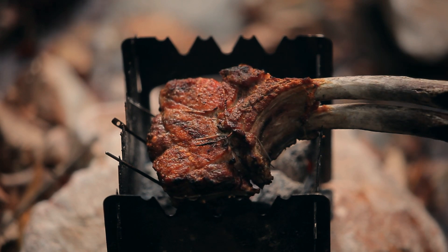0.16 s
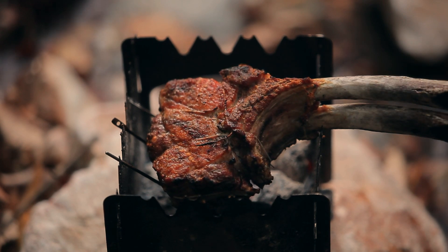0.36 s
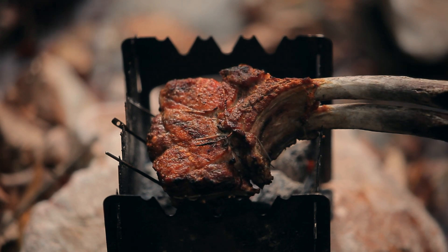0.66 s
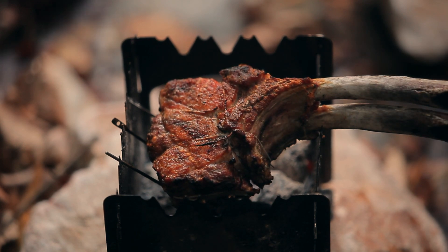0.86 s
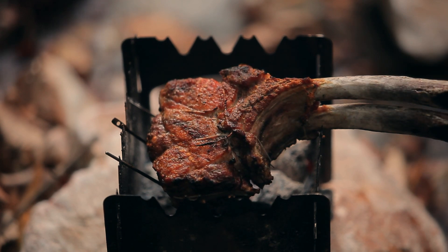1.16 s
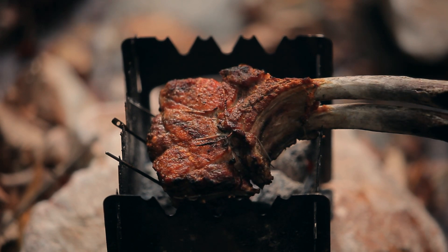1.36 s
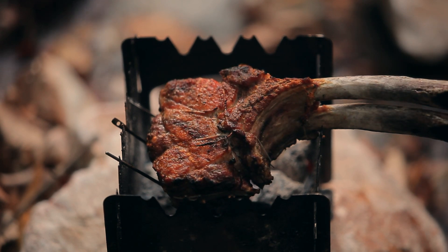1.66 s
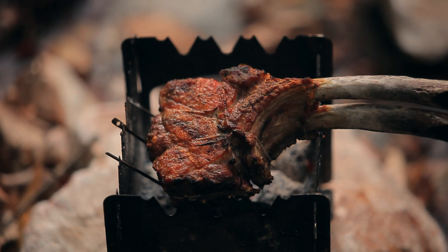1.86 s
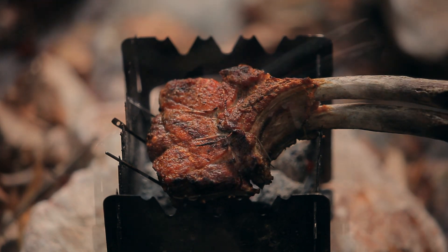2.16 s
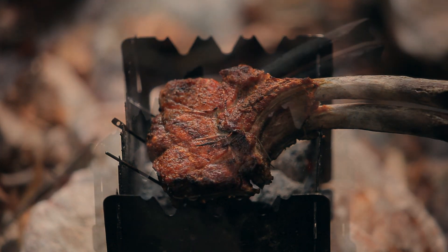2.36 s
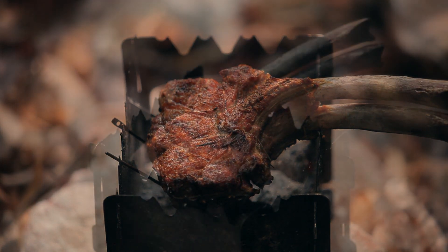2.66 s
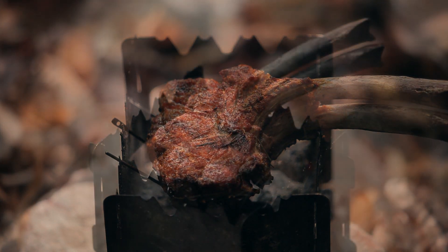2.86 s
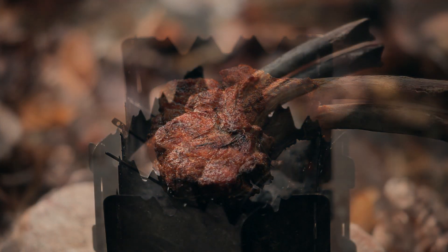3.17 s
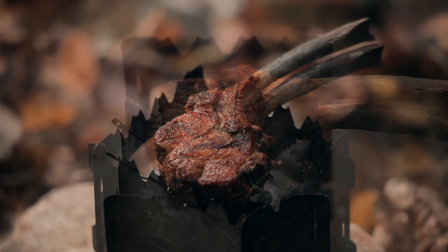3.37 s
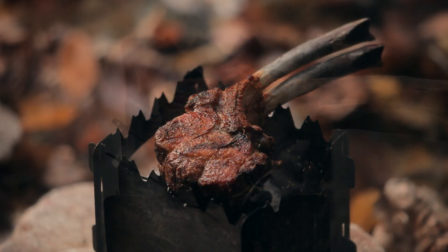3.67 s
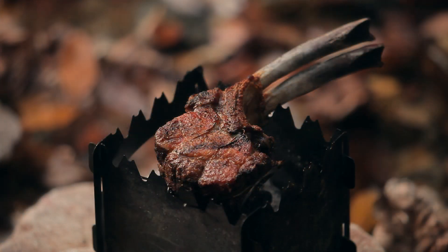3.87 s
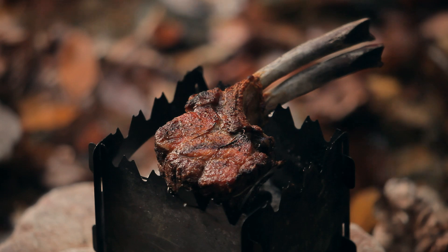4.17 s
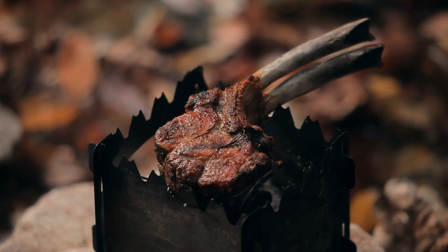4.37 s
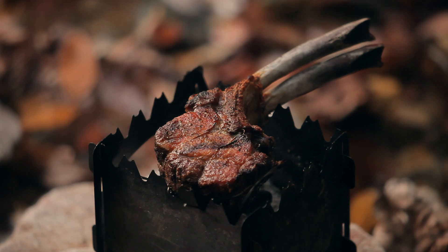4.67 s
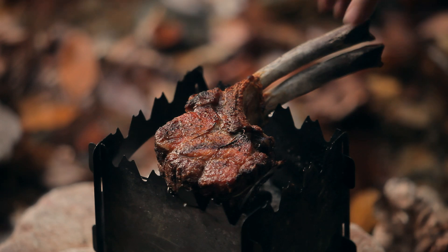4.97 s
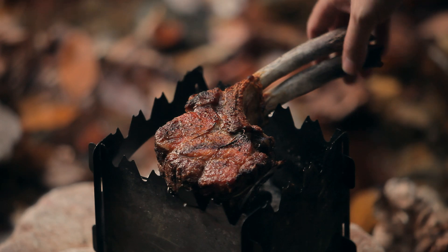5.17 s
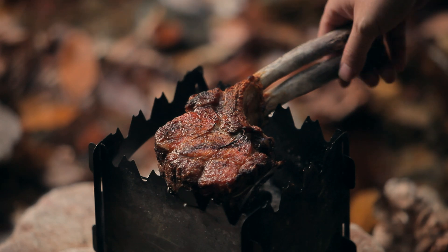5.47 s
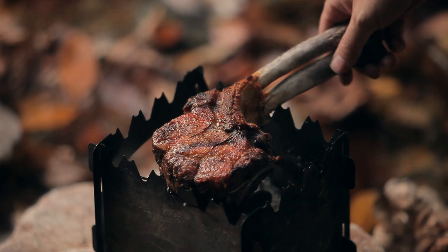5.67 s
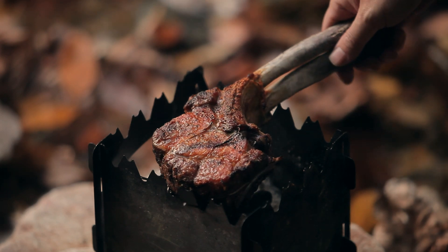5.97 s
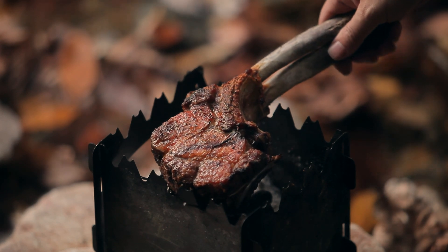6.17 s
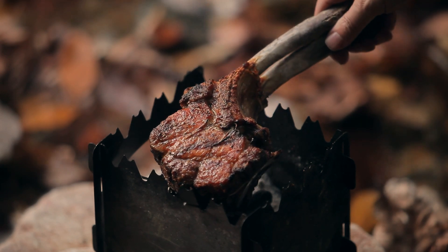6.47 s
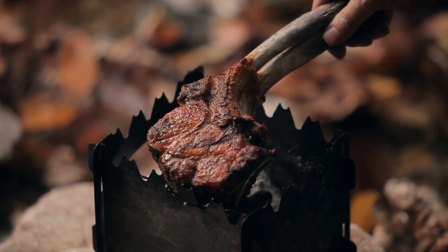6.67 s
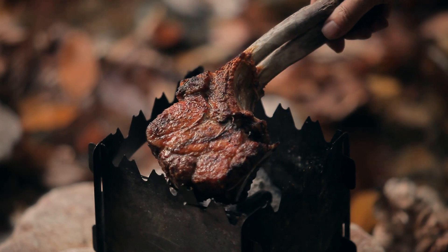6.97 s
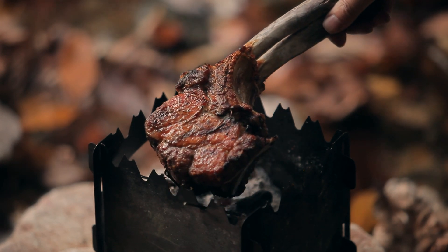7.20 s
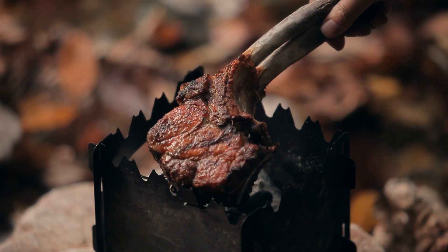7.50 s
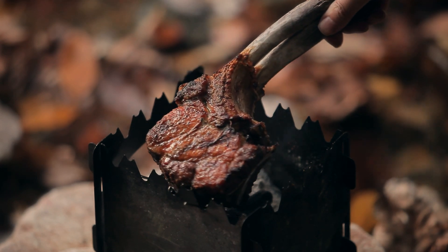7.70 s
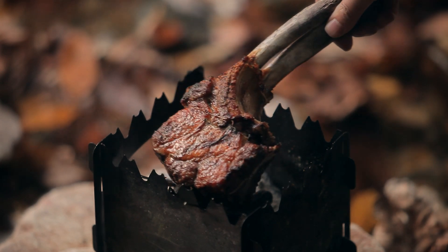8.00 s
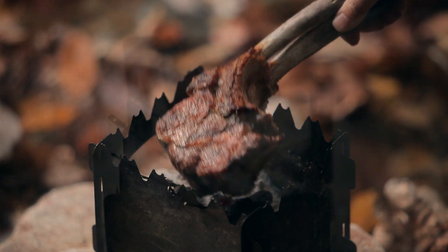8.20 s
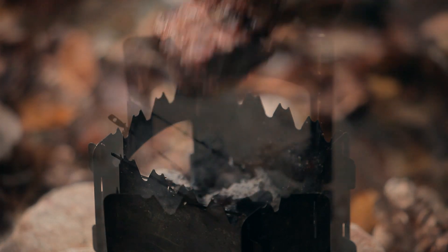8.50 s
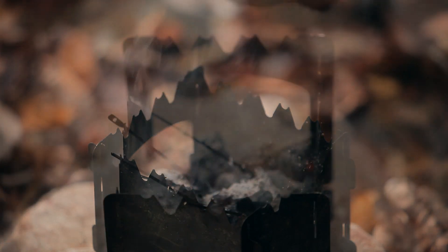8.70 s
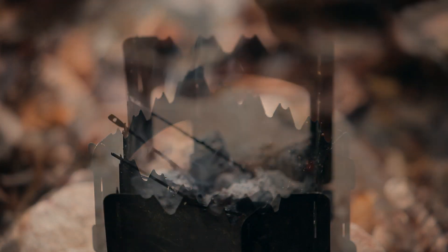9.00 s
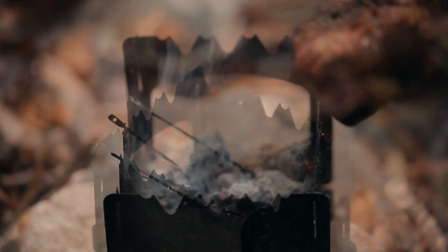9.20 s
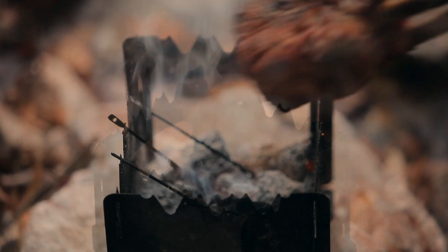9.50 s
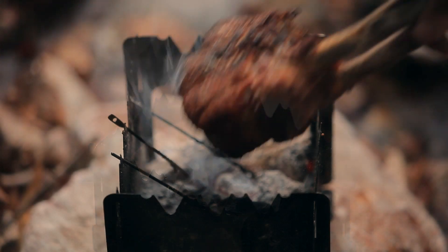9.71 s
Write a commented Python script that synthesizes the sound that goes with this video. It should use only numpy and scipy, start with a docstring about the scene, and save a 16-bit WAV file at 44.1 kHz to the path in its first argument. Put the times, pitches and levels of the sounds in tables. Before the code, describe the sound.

Fat seethes and hisses without pause over hot coals, mono and near, with almost no room sound beyond a very short tinny echo from the stove walls. Irregular mid-high pops and dry high ticks scatter on top. The first two and a half seconds add a dull breeze, small thumps, sputters and tiny steam squeaks; later it is cleaner, with a dense run of pops past seven seconds and sparser crackle afterwards.

```python
"""Meat sizzles over charcoal in a small sheet-metal camp stove outdoors: random short rings over a steam hiss.
Above this bed, steam bubbles burst in the fat, each a short ring at its own pitch with a broad snap.
Droplets spit with sharp ticks, the fat sputters in flurries, and steam squeaks in short sliding tones.
Pops and ticks echo off the metal walls, made by filtering them through a short fading noise.
Low thumps, and filtered noise for gusts and a dull wash of wind, come mostly in the first seconds."""
import sys
import numpy as np
from scipy import signal
from scipy.fft import rfft, irfft, next_fast_len
from scipy.io import wavfile
from scipy.ndimage import uniform_filter1d

SR = 44100
rng = np.random.default_rng(int(sys.argv[2]) if len(sys.argv) > 2 else 0)


def output_pcm(signal):
    """Save a mono or channel-first signal as 16-bit PCM at the path in sys.argv[1].

    Samples are clipped to [-1, 1] before scaling.
    """
    pcm = np.clip(np.atleast_2d(signal).T, -1, 1) * 32767
    wavfile.write(sys.argv[1], SR, np.round(pcm).astype(np.int16))


N = 434385  # length in samples


def from_db(db):
    """Turns dB into a gain."""
    return 10 ** (np.asarray(db) / 20)


def rms_one(x):
    """Scales a sound so that its average strength (rms) is 1."""
    return x / np.sqrt(np.mean(x ** 2) + 1e-20)


def filtered(x, order, edges_hz, kind):
    """Keeps only part of the spectrum: a band, or all above an edge."""
    return signal.sosfilt(signal.butter(order, edges_hz, kind, fs=SR, output="sos"), x)


def random_signs(count):
    """Lets each click push either up or down at random."""
    return rng.choice([-1, 1], count)


def drift(rate_hz):
    """Slow random wandering with spread 1: noise smoothed twice by a one-pole low-pass."""
    step = 40  # one slow value every 40 samples
    r = np.exp(-2 * np.pi * rate_hz * step / SR)
    noise = rng.standard_normal(N // step + 2002)
    slow = signal.lfilter([1], [1, -2 * r, r * r], noise)[2000:]  # skip the filter's start
    return np.interp(np.arange(N) / step, np.arange(len(slow)), rms_one(slow))


# How lively the sizzle is. Each row: time in seconds, then the level of the bubbling, of the fine fizz
# and of the low murmur, each in dB.
SIZZLE_LEVELS = [(0.0, -43, -51, -57.5), (0.52, -44, -50.5, -56.5), (0.96, -47.5, -53.5, -62),
                 (1.45, -42.5, -52.5, -57), (1.67, -46.5, -53.5, -63.5), (2.17, -44, -51, -56),
                 (2.36, -44, -53, -60.5), (2.65, -47.5, -56, -62), (3.4, -50, -57, -62),
                 (3.7, -47, -56.5, -60.5), (4.2, -44.5, -56, -56.5), (4.63, -45, -54, -59),
                 (5.43, -43.5, -54.5, -58), (5.73, -40.5, -51, -54.5), (5.98, -43, -54.5, -56),
                 (6.61, -44.5, -52.5, -58.5), (6.88, -41, -51, -57), (7.1, -43.5, -53, -58),
                 (7.45, -42.5, -51.5, -57), (7.9, -45.5, -54, -61.5), (8.15, -47.5, -57.5, -61),
                 (9.1, -45.5, -53, -60.5), (9.5, -47.5, -53, -60), (9.85, -44, -52.5, -58)]


def sizzle_levels():
    """The sizzle grows and shrinks: each level moves in straight lines from row to row."""
    seconds, *columns = np.transpose(SIZZLE_LEVELS)
    return [np.interp(np.arange(N) / SR, seconds, column) for column in columns]


def ring(clicks, hz, t60):
    """Each click sets a sine ringing, which falls by 60 dB in t60 seconds."""
    r = from_db(-60 / (t60 * SR))
    w = 2 * np.pi * hz / SR
    return signal.lfilter([0, np.sin(w)], [1, -2 * r * np.cos(w), r * r], clicks + 1e-18)


def grains(low_hz, high_hz, per_s, spread_db, cycles, clumps_db, hiss_db, count):
    """Random bursts of all sizes come in clumps, each rings at one of many pitches, over a steam hiss."""
    sizes = from_db(spread_db * np.minimum(rng.exponential(1, N), 3.5)) * random_signs(N)
    born = rng.random(N) < per_s * from_db(clumps_db) / SR
    pitch_number = rng.integers(0, count, N)
    rings = np.zeros(N)
    for k, hz in enumerate(np.geomspace(low_hz, high_hz, count)):
        rings += ring(sizes * born * (pitch_number == k), hz, cycles / hz)
    hiss = signal.lfilter([1], [1, -.9], rng.standard_normal(N))
    return rms_one(rings) + from_db(hiss_db) * rms_one(hiss)


def coloured(x, spectrum):
    """Evens out the long-term spectrum of x, then gives it the table's colour, at rms 1."""
    size = next_fast_len(N)
    bins = rfft(x, size)
    hz = np.arange(size // 2 + 1) * SR / size + 1  # the 1 avoids log(0)
    own = np.sqrt(uniform_filter1d(np.abs(bins) ** 2, size=1501)) + 1e-12
    table_hz, table_db = np.transpose(spectrum)
    wanted_db = np.interp(np.log(hz), np.log(table_hz), table_db, left=-90, right=-90)
    return rms_one(irfft(bins / own * from_db(wanted_db), size)[:N])


# Colour of the bubbling. Each row: frequency in Hz, relative strength in dB per Hz.
BUBBLING_COLOUR = [(260, -21.5), (450, -8), (612, -7), (713, 0), (970, 0), (1060, -1.5), (1290, 0),
                   (1790, -1), (3210, 2.5), (4030, -8), (5200, -21), (6760, -28), (11400, -120)]


def bubbling(level_db, seethe):
    """The body of the sizzle: a crowd of small ringing bursts and hiss in the middle pitches."""
    clumps_db = 2.5 * seethe + 1.5 * drift(30)
    crowd = grains(487, 4994, per_s=1500., spread_db=3.5, cycles=45.0,
                   clumps_db=clumps_db, hiss_db=-2.0, count=24)
    return from_db(level_db) * coloured(crowd, BUBBLING_COLOUR)


# Colour of the fine fizz. Each row: frequency in Hz, relative strength in dB per Hz.
FIZZ_COLOUR = [(2350, -7), (4000, -0.5), (4960, -1.5), (8120, -6.5), (13900, -17.5), (15200, -16.5),
               (16000, -29)]


def fizz(level_db, seethe):
    """The treble of the sizzle: high ringing bursts under a stronger hiss."""
    clumps_db = 3.0 * seethe + 2.0 * drift(30)
    crowd = grains(3660, 14900, per_s=2000., spread_db=6.5, cycles=53.0,
                   clumps_db=clumps_db, hiss_db=7.0, count=20)
    return from_db(level_db) * coloured(crowd, FIZZ_COLOUR)


# Colour of the low murmur. Each row: frequency in Hz, relative strength in dB per Hz.
MURMUR_COLOUR = [(26, -69), (45, -37), (75, -30), (108, -19.5), (179, -16), (252, -9.5), (310, -8.5),
                 (351, -2), (390, -1), (432, -7.5), (485, -9), (556, -5.5), (700, -7), (910, -24),
                 (1540, -120)]


def murmur(level_db):
    """The low part of the sizzle: fewer, deeper ringing bursts that clump on their own."""
    crowd = grains(111.0, 666, per_s=600., spread_db=2.5, cycles=19.3,
                   clumps_db=2.5 * drift(25), hiss_db=-1.0, count=10)
    return from_db(level_db) * coloured(crowd, MURMUR_COLOUR)


def scattered(rule, level_db):
    """Gives rows (seconds, peak dB, Hz) at random moments, louder where the sizzle is livelier."""
    per_s, above_db, spread_db, low_hz, high_hz = rule
    gap, size, pitch = rng.random((400, 3)).T
    s = np.cumsum(-np.log(1 - gap)) / per_s
    inside = s < N / SR - .01
    s, size, pitch = s[inside], size[inside], pitch[inside]
    peak_db = level_db[(s * SR).astype(int)] + above_db + spread_db * (2 * size - 1)
    hz = low_hz * (high_hz / low_hz) ** np.sqrt(pitch)  # the root favours high pitches
    return np.column_stack([s, peak_db, hz])


def bursts(events, rise, fall_db, glide, wobble):
    """Each burst swells within a cycle or so, dies away, and bends a little in pitch, each by its own amount."""
    out = np.zeros(N + SR)
    chance = rng.standard_normal((len(events), 2))
    for (s, peak_db, hz, cycles), (bend, side) in zip(events, chance):
        turns = np.arange(int(max(cycles, 1) / hz * SR)) * hz / SR  # cycles since the start
        swell = 1 - np.exp(-turns / max(rise, .05))
        fall = from_db(-fall_db * turns / max(cycles, 1))
        phase = turns * (1 + (glide + wobble * bend) * (turns - 4.0))
        wave = swell * fall * np.sin(2 * np.pi * phase)
        at = round(s * SR)
        out[at:at + len(wave)] += from_db(peak_db) * np.sign(side) * wave / np.abs(wave).max()
    return out[:N]


def snaps(s, snap_db):
    """Every bubble opens with a broad snap: a single click limited to a wide band."""
    out = np.zeros(N)
    out[np.round(s * SR).astype(int)] = from_db(snap_db) * random_signs(len(s))
    return filtered(out, 2, [1500, 8000], "band")


# Bubbles that stand out, at fixed times. Each row: start in seconds, peak of the ring in dB, pitch in Hz,
# length of the ring in cycles, height in dB of the opening click before its filter.
TIMED_POPS = [(0.0629, -41, 1080, 25, -30), (0.0633, -36, 2240, 18, -30), (0.1751, -34, 1380, 19, -31),
              (0.5034, -24.5, 3480, 21, -28), (0.5982, -31, 2960, 16, -33), (0.6124, -40, 1450, 33, -32),
              (0.6262, -37, 1490, 28, -26), (0.994, -30.5, 3600, 21, -25), (1.031, -32, 2970, 19, -23),
              (1.1427, -31.5, 3120, 37, -31), (1.213, -31, 3930, 18, -29), (1.225, -32, 3290, 10, -27),
              (1.4635, -32.5, 760, 14, -31), (1.4821, -37, 3970, 20, -27), (1.4858, -25, 2430, 14, -25),
              (1.5991, -35, 4350, 18, -15), (1.7464, -29, 2860, 18, -25), (1.9135, -31, 2930, 14, -28),
              (1.9992, -34, 2730, 15, -35), (2.2838, -36, 690, 18, -34), (2.3028, -33, 3780, 22, -34),
              (2.316, -32.5, 800, 14, -32), (2.3716, -28.5, 3490, 15, -27), (2.4113, -34, 3540, 19, -17),
              (2.4721, -36, 850, 12, -34), (2.5327, -40, 4170, 39, -34), (2.7435, -38, 4190, 18, -35),
              (3.058, -39, 4000, 22, -38), (3.1115, -39, 584, 17, -36), (3.1314, -32, 3200, 13, -30),
              (3.5365, -33, 3170, 18, -39), (3.5477, -37, 4460, 20, -27), (3.5873, -40, 682, 32, -31),
              (3.635, -36, 3880, 20, -35), (3.6559, -35, 2480, 21, -20), (3.6769, -29.5, 3280, 10, -22),
              (3.776, -27, 2900, 12, -37), (3.8076, -34, 4330, 15, -18), (3.949, -36, 3440, 38, -29),
              (3.9827, -35, 3750, 18, -16), (3.9929, -32, 3580, 18, -29), (4.0333, -35.5, 840, 18, -30),
              (4.0841, -31, 2740, 13, -23), (4.0972, -35, 2200, 16, -27), (4.1843, -30, 2920, 10, -21),
              (4.1968, -32, 3170, 38, -32), (4.3288, -30, 2530, 31, -32), (4.408, -41, 4100, 39, -28),
              (4.5938, -36, 3420, 10, -13.5), (4.6302, -40, 735, 19, -37), (4.6885, -30.5, 2530, 15, -37),
              (4.7925, -34, 2420, 24, -39), (4.8198, -36, 1520, 12, -31), (4.9739, -33, 2450, 26, -31),
              (4.9946, -34.5, 830, 27, -35), (5.0216, -38, 810, 39, -29), (5.1179, -31, 3130, 48, -30),
              (5.2892, -35, 960, 24, -33), (5.5334, -29, 3350, 17, -23), (5.5579, -31, 3230, 50, -26),
              (5.5682, -31, 2560, 31, -26), (5.6293, -32, 2630, 17, -38), (5.7629, -32, 3530, 17, -21),
              (5.8185, -33, 3820, 22, -23), (5.835, -34.5, 4030, 48, -17), (5.8362, -35, 1000, 12, -25),
              (5.8961, -38, 710, 38, -33), (5.9177, -29, 2560, 26, -29), (5.9749, -33, 4030, 30, -22),
              (5.9884, -28, 4000, 16, -18), (6.144, -42, 745, 16, -32), (6.1697, -38.5, 740, 16, -30),
              (6.1894, -33.5, 1080, 16, -28), (6.2294, -29, 3260, 24, -30), (6.3522, -30, 2560, 27, -23),
              (6.3833, -29, 3100, 35, -34), (6.4148, -31, 2530, 38, -25), (6.439, -30, 2530, 15, -26),
              (6.477, -31.5, 3550, 20, -23), (6.4775, -40, 786, 15, -30), (6.651, -37, 1810, 21, -33),
              (6.8187, -35, 2410, 19, -33), (6.8587, -38, 3820, 20, -19), (6.8966, -30, 2980, 17, -22),
              (6.9462, -34.5, 3720, 50, -22), (7.0103, -30, 2160, 14, -16), (7.0802, -40, 630, 21, -33),
              (7.1857, -32, 3330, 20, -33), (7.2679, -32, 720, 21, -34), (7.3036, -28, 2430, 10, -30),
              (7.3411, -28, 2960, 13, -27), (7.392, -26, 3100, 33, -34), (7.4736, -25.5, 3040, 22, -26),
              (7.5738, -38.5, 700, 67, -33), (7.6019, -28, 2560, 43, -25), (7.6264, -31, 2260, 13, -32),
              (7.6285, -31, 3400, 21, -36), (7.6616, -36, 710, 16, -34), (7.6714, -32, 1920, 15, -28),
              (7.701, -29, 2320, 20, -36), (7.7041, -24, 2980, 20, -33), (7.7786, -32.5, 2900, 21, -33),
              (7.8681, -38, 1330, 41, -38), (7.8881, -33, 4000, 18, -39), (7.9325, -38, 745, 21, -33),
              (7.9796, -36, 3730, 22, -29), (8.0564, -38, 4600, 13, -20), (8.3251, -41, 1050, 50, -41),
              (8.3444, -33, 2800, 45, -37), (8.4338, -35.5, 3380, 30, -27), (8.5098, -30, 2330, 17, -35),
              (8.5483, -34, 2390, 20, -31), (8.5711, -30.5, 3400, 25, -30), (8.7354, -38, 760, 17, -35),
              (9.0031, -34.5, 1330, 15, -33), (9.3281, -30.5, 3300, 24, -30), (9.7214, -36, 1430, 20, -26),
              (9.7574, -36, 3460, 40, -27)]
# More bubbles at random, one row: how many per second, peak above the bubbling level in dB,
# spread to either side in dB, lowest and highest pitch in Hz.
RANDOM_POPS_RULE = (8., 5.7, 1.2, 587, 3890)


def pops(bubbling_db):
    """Steam bubbles burst in the fat: a snap, then a short ring whose pitch tends to climb."""
    more = scattered(RANDOM_POPS_RULE, bubbling_db)
    cycles = np.full(len(more), 17.5)
    snap_db = more[:, 1] + 6
    bubbles = np.vstack([TIMED_POPS, np.column_stack([more, cycles, snap_db])])
    rings = bursts(bubbles[:, :4], rise=1.1, fall_db=49, glide=0.0021, wobble=0.005)
    return rings + snaps(bubbles[:, 0], bubbles[:, 4])


def cracks(s, crack_db):
    """The skin of a droplet tears: a needle-sharp click with no bass."""
    out = np.zeros(N)
    at = np.round(s * SR).astype(int) + 4  # 4 samples after the ring starts
    out[at] = from_db(crack_db) * random_signs(len(s))
    return filtered(out, 2, 5500, "high")


def spatter(per_s, spread_db, clumps_db):
    """Small droplets landing on hot coal: bare clicks that reach from the mids to the top."""
    sizes = from_db(spread_db * np.minimum(rng.exponential(1, N), 3.2)) * random_signs(N)
    clicks = sizes * (rng.random(N) < per_s * from_db(clumps_db) / SR)
    return rms_one(filtered(clicks, 2, [2500, 11000], "band"))


# Spitting droplets that stand out, at fixed times. Each row: start in seconds, peak of the ring in dB,
# centre pitch in Hz, height in dB of the opening crack before its filter.
TIMED_TICKS = [(0.122, -39, 10820, -32), (0.3329, -31, 7610, -44.0), (0.3394, -24.5, 6240, -44),
               (0.5474, -35, 7980, -45), (0.6185, -35.0, 8180, -49.0), (0.6871, -28.5, 8100, -45.0),
               (0.7456, -29, 14380, -29), (0.929, -28, 6940, -52.0), (0.994, -32, 5050, -44),
               (1.2593, -32, 7530, -49.0), (1.2792, -33.0, 6880, -51.0), (1.2972, -28.5, 8900, -36.0),
               (1.3426, -36, 7240, -53.0), (1.4775, -33, 6480, -46.0), (1.5995, -26, 5930, -39),
               (1.6274, -33, 8130, -52), (1.7407, -28.5, 5790, -53.0), (1.84, -27, 5000, -50),
               (1.8514, -29, 8700, -39.0), (1.9203, -32, 6800, -44.0), (2.1215, -39.0, 12460, -41),
               (2.1454, -33, 9500, -35.0), (2.1719, -42, 12630, -39.0), (2.2133, -33.0, 10000, -39.0),
               (2.2702, -33, 8900, -44.0), (2.342, -36.0, 10170, -35.0), (2.3495, -32.0, 9290, -39.0),
               (2.3917, -34, 9780, -37.0), (2.598, -31.5, 5240, -47.0), (2.6189, -32, 7080, -56.0),
               (2.7359, -40.0, 11540, -39.0), (2.8624, -31.5, 5200, -49.0), (2.8965, -34.5, 7950, -39.0),
               (2.9609, -33, 5490, -45.5), (3.1564, -31.5, 9700, -36.0), (3.2303, -33.0, 6550, -46.0),
               (3.2562, -39, 9880, -44), (3.3266, -35.5, 5110, -58), (3.5203, -41.0, 13430, -41.0),
               (3.5471, -38, 5870, -41.0), (3.7412, -32.5, 5750, -48.0), (3.8077, -36, 8900, -46),
               (3.8544, -36, 6700, -45.0), (4.0072, -35, 13330, -35.0), (4.1848, -28, 13890, -26.0),
               (4.1951, -36, 9220, -48.0), (4.417, -37, 14780, -38.0), (4.5293, -33, 7500, -48.0),
               (4.5939, -32.0, 14340, -28), (4.607, -34, 7600, -46), (4.6413, -33, 11500, -28.0),
               (4.8401, -38.0, 13900, -38.0), (4.8578, -34, 10390, -35), (5.1547, -34.0, 7780, -43.0),
               (5.3487, -34.0, 13930, -33.0), (5.3741, -33, 13080, -32.0), (5.4672, -30, 11350, -35.0),
               (5.5999, -39, 11970, -35.0), (5.9109, -28.5, 8040, -48), (5.9883, -28, 6430, -45.0),
               (6.2289, -34, 11430, -34.0), (6.427, -33, 9610, -41.0), (6.5699, -34, 12600, -25),
               (6.6647, -34, 14330, -29), (7.0282, -31.0, 7540, -39), (7.1723, -34.0, 14470, -29),
               (7.2734, -29.5, 7060, -40.0), (7.2937, -34, 12760, -33.0), (7.3264, -35, 13790, -29.0),
               (7.3416, -31, 12300, -32.0), (7.3993, -34, 11500, -36.0), (7.4208, -33, 8030, -51),
               (7.4474, -35.0, 9960, -39.0), (7.4601, -38.0, 13680, -35.0), (7.4692, -30, 7740, -38.0),
               (7.6382, -36, 13640, -38.0), (7.9643, -25, 10100, -21), (8.0566, -32.5, 7100, -29),
               (8.2948, -39, 6260, -59.0), (8.714, -37, 11020, -40.0), (8.8138, -35.0, 11990, -34.0),
               (9.1786, -29.5, 5100, -44.0), (9.5761, -37, 8960, -44.0), (9.6368, -32.5, 5520, -57.0),
               (9.7204, -34, 5600, -36)]
# More droplets at random, one row: how many per second, peak above the fizz level in dB,
# spread to either side in dB, lowest and highest pitch in Hz.
RANDOM_TICKS_RULE = (22., 13, 4.0, 4900, 14200)


def ticks(fizz_db, seethe):
    """Droplets spit: a sharp crack and a very short high ring, among finer spatter."""
    more = scattered(RANDOM_TICKS_RULE, fizz_db)
    more_crack_db = more[:, 1] - 2.0
    droplets = np.vstack([TIMED_TICKS, np.column_stack([more, more_crack_db])])
    s, peak_db, hz, crack_db = droplets.T
    cycles = np.full(len(s), 22.5)
    rings = bursts(np.column_stack([s, peak_db, hz, cycles]), rise=0.41, fall_db=91, glide=.001, wobble=0.021)
    fine = from_db(fizz_db - 8.5) * spatter(per_s=150., spread_db=9.5, clumps_db=4.0 * seethe)
    return rings + cracks(s, crack_db) + fine


STOVE_T60_S = 0.019  # seconds for the echoes to fall by 60 dB


def stove(x):
    """Quick dense reflections off the metal walls; the small box returns little bass and a duller top."""
    t = np.arange(int(.05 * SR)) / SR
    echoes = rng.standard_normal(len(t)) * from_db(-60 * t / STOVE_T60_S)
    echoes *= t > .0008  # the first echo needs a moment to return
    thin = filtered(x, 1, [1500, 9000], "band")
    return signal.fftconvolve(thin, echoes / np.sqrt(np.sum(echoes ** 2)))[:N]


# Flurries of sputtering fat. Each row: start in seconds, length in seconds, level in dB before the fades,
# lowest and highest frequency in Hz.
FLURRY_TIMES = [(0.588, 0.076, -41, 300, 3620), (0.574, 0.093, -50.5, 100, 500),
                (.730, .045, -47.5, 120, 696), (1.327, 0.049, -49, 100, 497),
                (1.285, 0.063, -45, 900, 3650), (1.459, 0.037, -43.5, 600, 3600),
                (1.499, .08, -44, 1300, 3740), (2.224, 0.041, -43, 400, 1800),
                (2.293, 0.04, -46, 500, 1600), (2.466, 0.038, -47, 400, 1400),
                (3.111, 0.013, -41.5, 300, 2500), (3.585, 0.037, -56, 500, 1100),
                (7.692, 0.01, -39.5, 2100, 3470)]


def flurries():
    """Fat sputters: thousands of uneven clicks a second, run together in one band."""
    out = np.zeros(N)
    for s, length, level_db, low_hz, high_hz in FLURRY_TIMES:
        size, at = int(length * SR), round(s * SR)
        heights = np.clip(rng.standard_normal(size), -2.3, 2.3) ** 3
        clicks = heights * (rng.random(size) < .35)
        band = filtered(clicks, 2, [low_hz, high_hz], "band")
        out[at:at + size] += from_db(level_db) * rms_one(band) * signal.windows.tukey(size, .4)
    return out


# Steam squeaking out of the fat. Each row: start in seconds, length in seconds,
# peak in dB before the unsteadiness, first and last pitch in Hz.
SQUEAK_TIMES = [(0.346, 0.014, -38.5, 930, 1180), (.361, 0.011, -42, 1100, 1100),
                (0.645, 0.013, -33, 1890, 1820), (2.23, 0.03, -44, 763, 1420),
                (2.626, 0.021, -45, 1400, 1440), (3.065, 0.028, -50, 1240, 1200),
                (8.738, 0.023, -42.5, 780, 1160), (9.393, 0.042, -49, 512, 456)]


def squeaks():
    """A held, slightly unsteady tone that slides from one pitch to another."""
    out = np.zeros(N)
    unsteady = from_db(0.93 * drift(120))
    for s, length, peak_db, first_hz, last_hz in SQUEAK_TIMES:
        size, at = int(length * SR), round(s * SR)
        phase = 2 * np.pi * np.cumsum(np.linspace(first_hz, last_hz, size)) / SR
        out[at:at + size] += from_db(peak_db) * np.sin(phase) * signal.windows.tukey(size, .35)
    return out * unsteady


# Low thumps. Each row: start in seconds, peak in dB, pitch in Hz, length of the ring in cycles.
THUMP_TIMES = [(0.583, -32, 345, 4), (0.626, -36, 250, 7.4), (0.644, -43, 186, 8.2), (0.742, -37, 384, 6.5),
               (0.756, -34, 204, 5.8), (1.236, -49, 104, 3.7), (1.333, -34, 261, 8.4),
               (1.357, -46, 125, 2.9), (1.754, -52, 191, 4.8), (1.914, -46, 231, 8.3),
               (2.226, -37.5, 490, 7.2), (2.327, -38, 313, 2.6), (2.354, -43, 222, 5.7),
               (2.469, -46, 320, 5.2), (3.112, -41, 540, 4.1), (3.947, -43, 212, 5.6)]


def thumps():
    """A few low cycles that swell fast and die, with a pitch that tends to sink."""
    return bursts(THUMP_TIMES, rise=0.52, fall_db=58, glide=-0.0085, wobble=0.017)


# Gusts buffeting the microphone. Each row: time of full strength in seconds, how long it holds in seconds,
# level in dB.
GUST_TIMES = [(.58, .06, -74), (0.744, 0.013, -47), (1.24, 0.052, -55), (1.35, .012, -53.5),
              (1.77, .012, -74), (1.93, 0.083, -60), (2.15, .015, -61), (2.28, .03, -65),
              (2.376, .015, -71), (2.48, .015, -67), (3.053, .03, -68)]
GUST_RISE_DB_PER_S, GUST_FALL_DB_PER_S = 600., 350.
BREEZE_DB, BREEZE_ENDS_S, CALM_DB = -83, 2.75, -89


def wind_db():
    """A light breeze that drops to calm, with gusts that rise fast, hold and fall more slowly."""
    t = np.arange(N) / SR
    level_db = np.where(t < BREEZE_ENDS_S, BREEZE_DB, CALM_DB).astype(float)
    for s, hold, db in GUST_TIMES:
        rise_db = GUST_RISE_DB_PER_S * np.maximum(s - t, 0)
        fall_db = GUST_FALL_DB_PER_S * np.maximum(t - s - hold, 0)
        level_db = np.maximum(level_db, db - rise_db - fall_db)
    return level_db


def rumble(level_db):
    """Lumpy low noise: air buffeting the microphone."""
    low = filtered(rng.standard_normal(N), 2, [54, 170], "band")
    return from_db(level_db) * rms_one(low * from_db(5.2 * drift(46)))


WASH_DB, WASH_FADES_S, WASH_FADE_DB_PER_S = -63, 2.4, 20.


def wash():
    """The dull wash of the breeze: steady low noise at first, then fading away."""
    low = filtered(rng.standard_normal(N), 2, [100, 500], "band")
    fading_s = np.maximum(np.arange(N) / SR - WASH_FADES_S, 0)
    return from_db(WASH_DB - WASH_FADE_DB_PER_S * fading_s) * rms_one(low)


def scene():
    """All layers added together, one channel."""
    bubbling_db, fizz_db, murmur_db = sizzle_levels()
    seethe = drift(22)  # the whole surface boils up and calms down together
    bed = bubbling(bubbling_db, seethe) + fizz(fizz_db, seethe) + murmur(murmur_db)
    popping = pops(bubbling_db)
    ticking = ticks(fizz_db, seethe)
    echoes = from_db(-4) * stove(popping + from_db(0.5) * ticking)  # ticks echo slightly more
    fat = bed + popping + ticking + echoes + flurries() + squeaks()
    return (fat + thumps() + rumble(wind_db()) + wash())[None]


def record(dry):
    """The microphone drops the deepest bass; the top is cut steeply."""
    no_bass = filtered(dry, 3, 42, "high")
    steep_cut = signal.ellip(12, .5, 70, 15889.5, fs=SR, output="sos")  # low-pass edge in Hz
    return signal.sosfilt(steep_cut, no_bass)


dry = scene()
out = record(dry)
output_pcm(out)
```